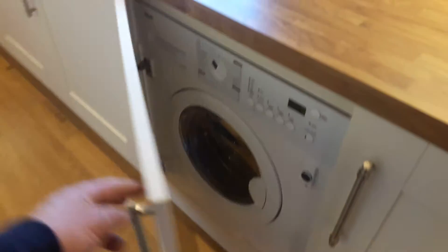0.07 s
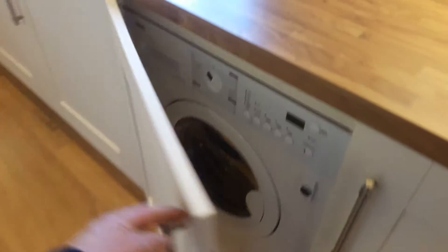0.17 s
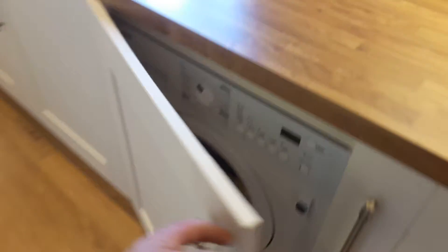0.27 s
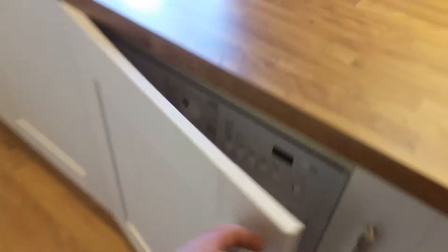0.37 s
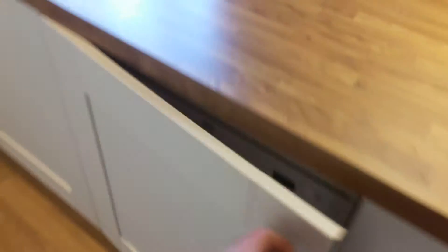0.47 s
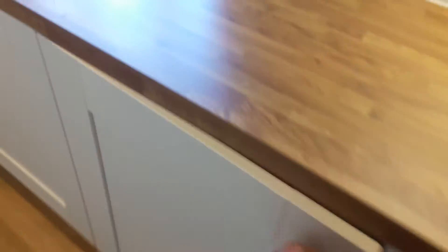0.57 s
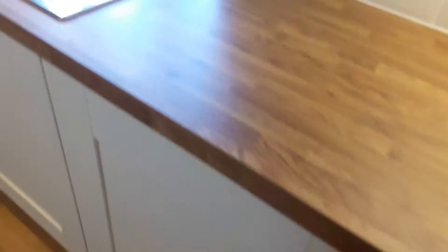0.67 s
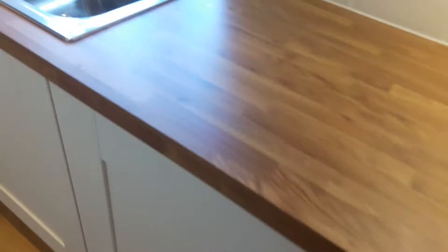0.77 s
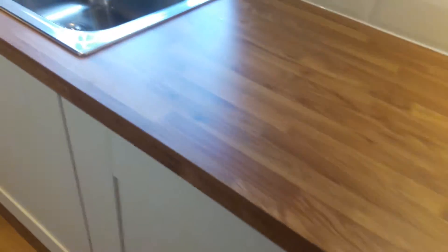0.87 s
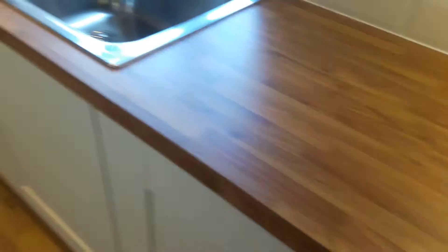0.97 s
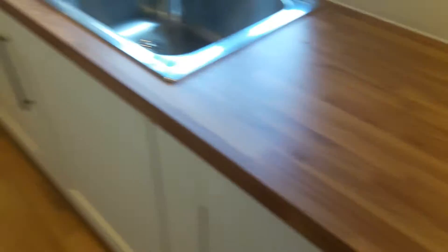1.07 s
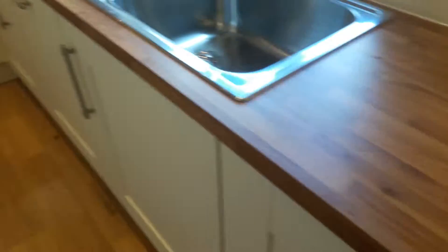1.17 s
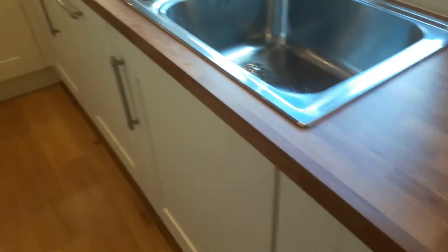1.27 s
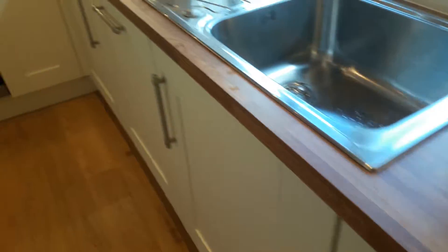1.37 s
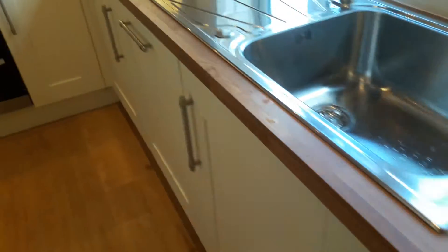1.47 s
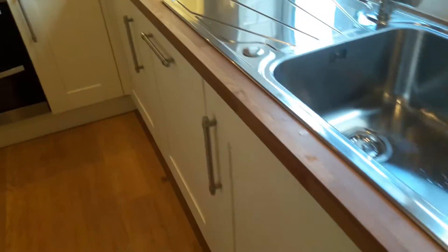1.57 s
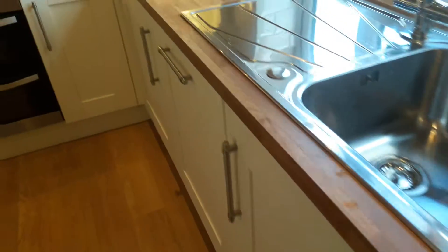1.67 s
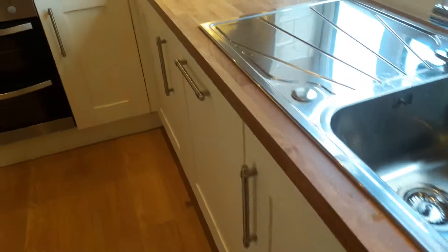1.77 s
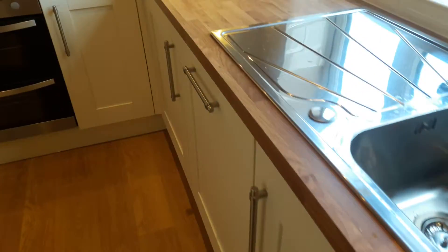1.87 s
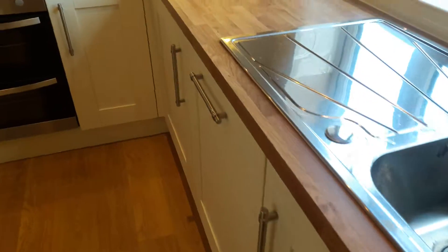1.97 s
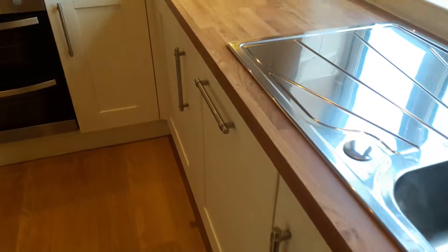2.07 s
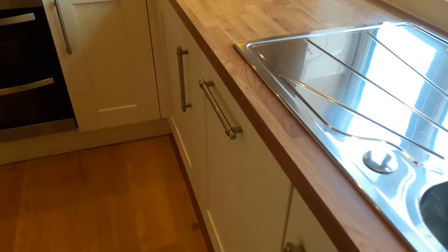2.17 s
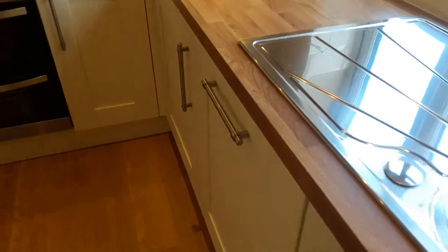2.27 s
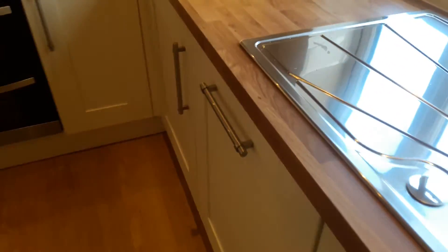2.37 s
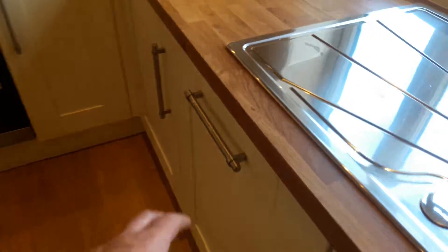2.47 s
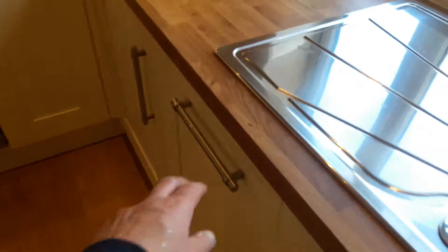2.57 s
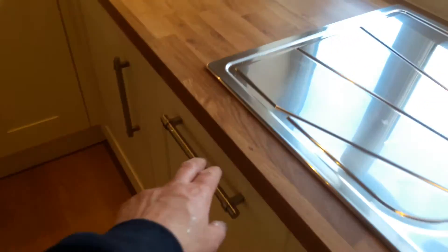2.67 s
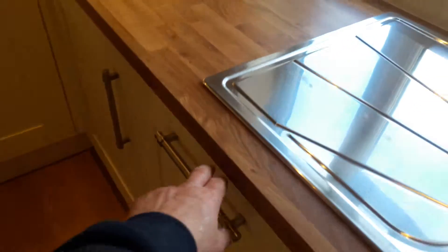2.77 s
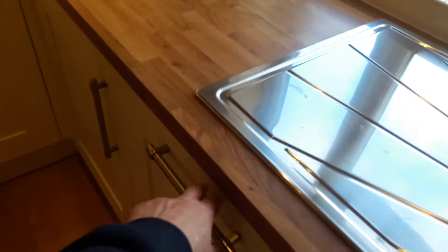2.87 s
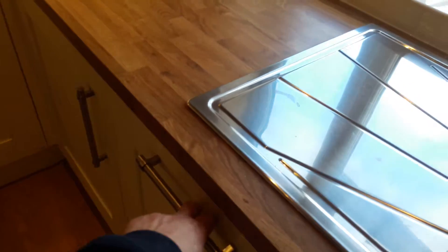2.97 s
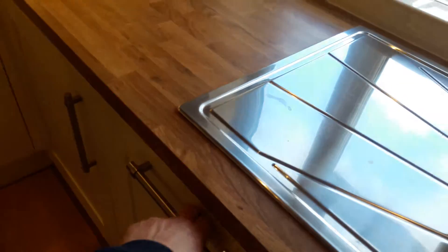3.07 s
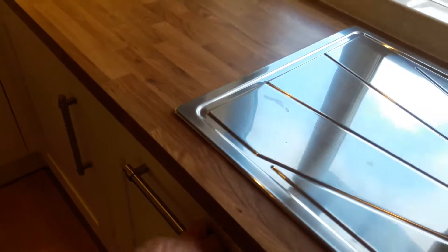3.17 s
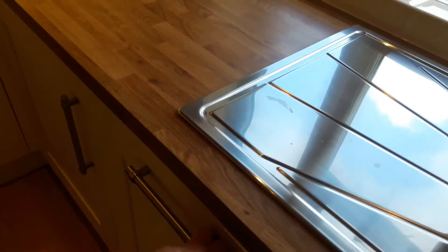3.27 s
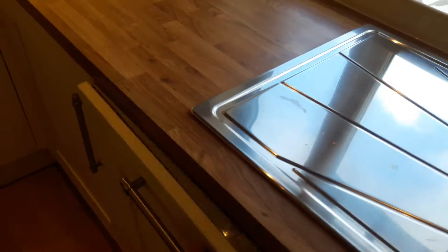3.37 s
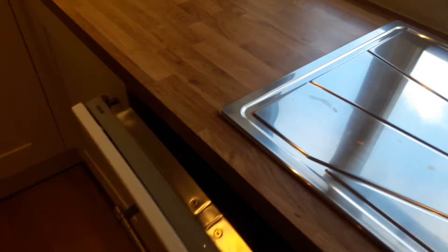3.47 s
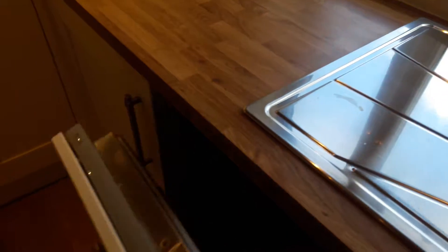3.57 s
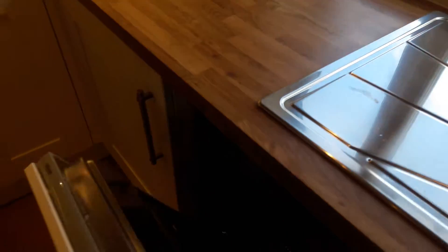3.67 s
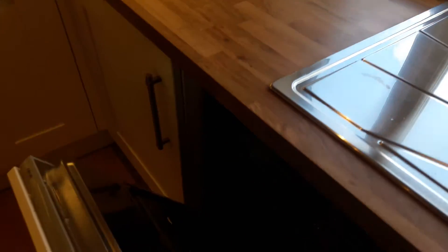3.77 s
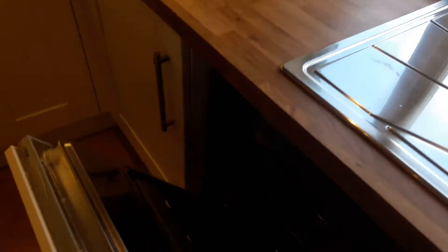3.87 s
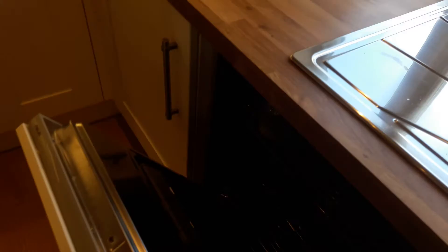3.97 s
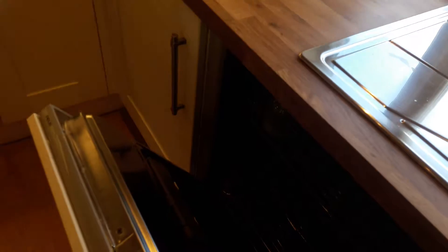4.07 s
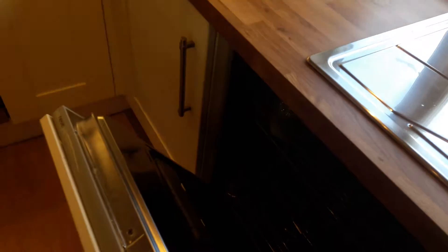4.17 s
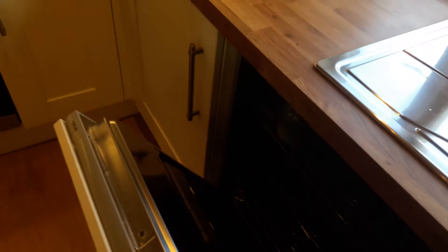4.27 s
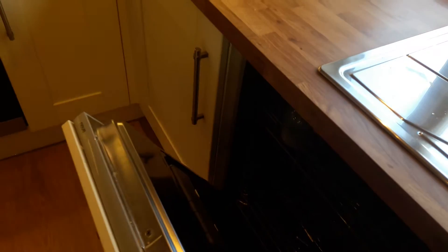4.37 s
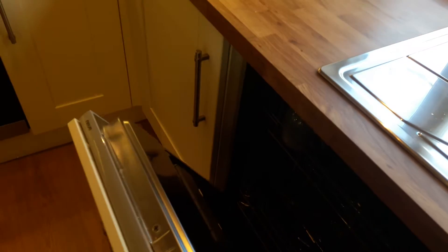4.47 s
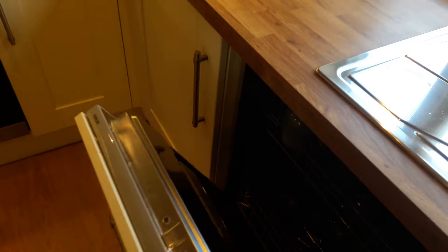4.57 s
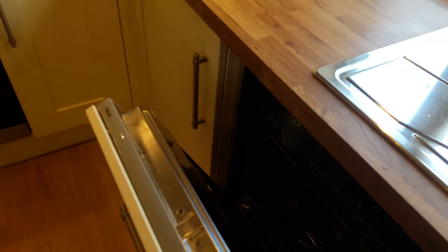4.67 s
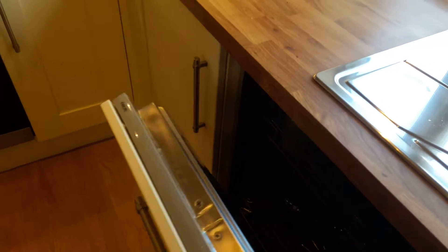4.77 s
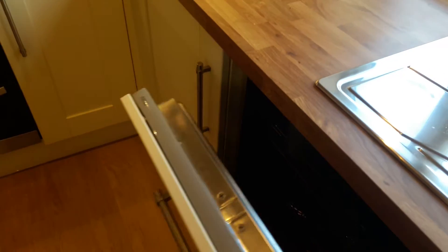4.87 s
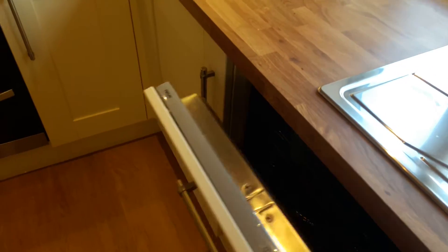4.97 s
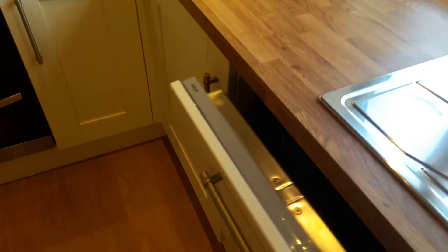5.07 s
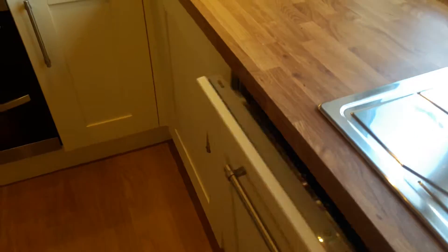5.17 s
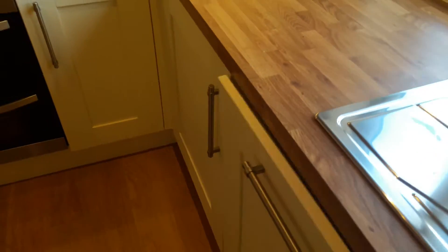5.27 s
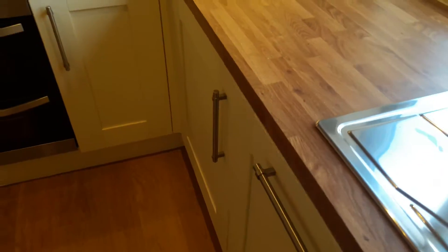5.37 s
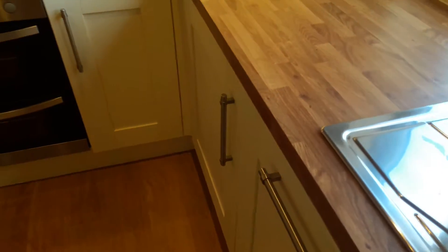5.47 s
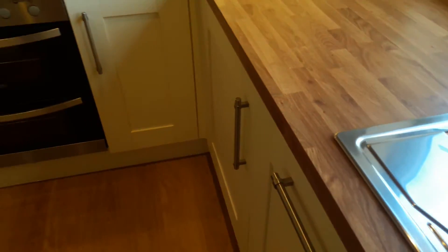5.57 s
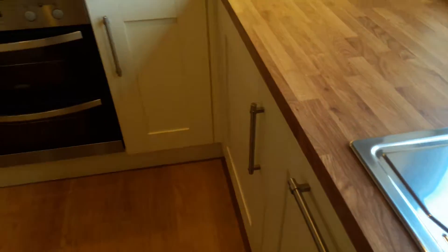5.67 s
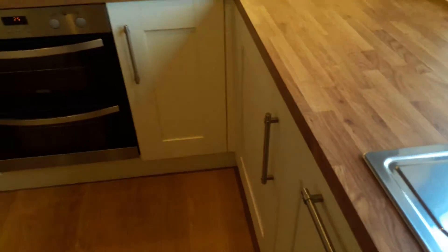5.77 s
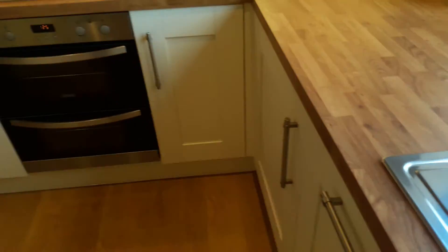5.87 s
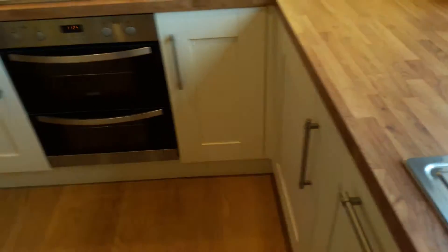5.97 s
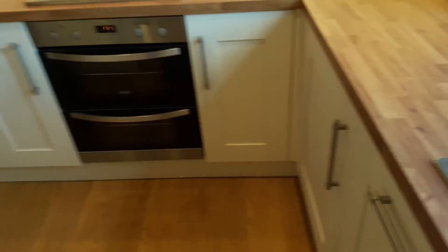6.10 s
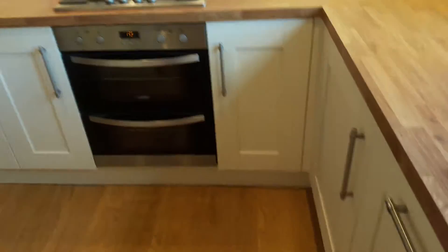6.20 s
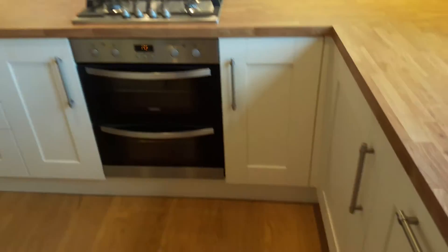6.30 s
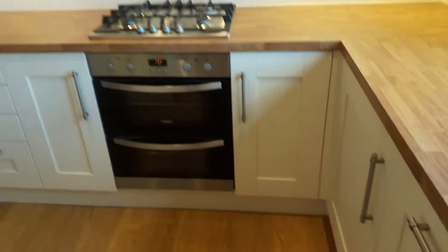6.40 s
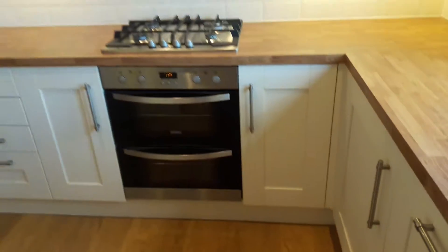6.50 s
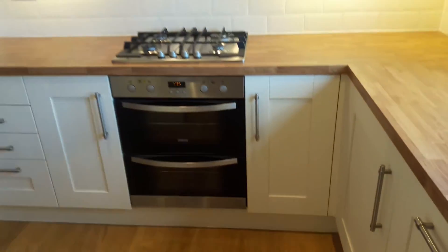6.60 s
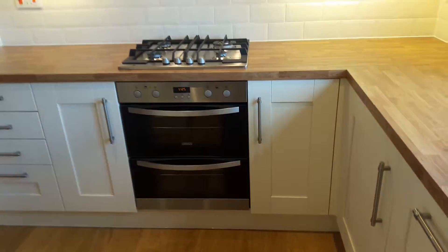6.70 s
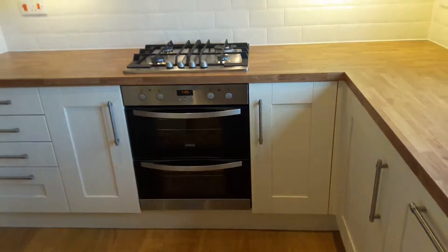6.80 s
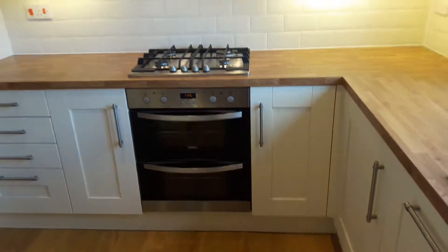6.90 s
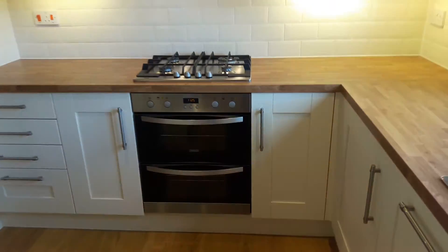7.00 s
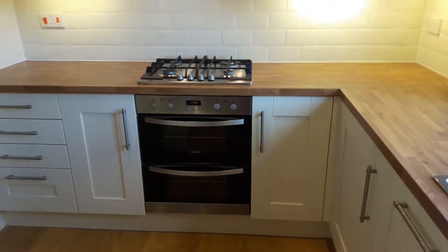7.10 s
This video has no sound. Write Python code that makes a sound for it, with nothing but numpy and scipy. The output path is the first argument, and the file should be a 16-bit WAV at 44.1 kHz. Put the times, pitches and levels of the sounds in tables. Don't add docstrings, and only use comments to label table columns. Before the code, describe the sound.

A quiet, bare kitchen with faint air hiss, heard through hand-held stereo microphones. Soft heel taps and a slight whoosh come at 0.2-0.45 seconds, then a wooden cupboard door shuts at about 0.78 with a tight cluster of hollow, woody knocks, ringing through the hard room. Shoes shuffle and heels tap at 1.5-1.6, with a firmer tap at 2.35 and a lighter one at 2.5; sleeves rustle. Tiny latch pings and a short push of air precede 3.39, when an appliance catch releases in a loud, sharp, rattling clunk. Cloth and soles brush over a fuzzy low hum until a step at 5.05. A faint, high hinge squeak at 5.36 and a low whoosh lead to a soft, dull seal bump at 5.47, then a heavy, full thud with a latch click at 5.74. Its tail fades under faint rustles and a light heel tap near 6.8, ending around 7.

```python
import sys
import numpy as np
from scipy import signal
from scipy.fft import rfft, irfft, next_fast_len
from scipy.io import wavfile
from scipy.ndimage import uniform_filter1d

SR = 44100
rng = np.random.default_rng(int(sys.argv[2]) if len(sys.argv) > 2 else 0)


def gain_from_db(level_db):
    decades = np.asarray(level_db, float) / 20
    return 10 ** decades


def generate_wav(signal):
    frames = np.transpose(np.atleast_2d(signal))
    scaled = np.clip(frames, -1, 1) * 32767
    pcm = np.round(scaled).astype(np.int16)
    wavfile.write(sys.argv[1], SR, pcm)


N = 314850

# time in seconds, strength in dB, contact time in ms.
CUPBOARD_BLOWS = [
    (.7735, -15, .12),
    (.7768, -5, .5),
    (.7797, -3, .3),
    (.7838, 0, .3),
    (.7868, -1, .3),
    (.790, 0, .25),
    (.8055, -4, .3),
]
LATCH_BLOWS = [
    (3.3902, -5, .15),
    (3.3945, -3, .3),
    (3.3985, 0, .4),
    (3.4043, -1, .2),
    (3.4085, -3, .1),
    (3.4205, -2, .3),
    (3.432, -4, .6),
]
SEAL_BLOWS = [
    (5.4678, -6, .15),
    (5.472, -4, .3),
    (5.4762, 0, 1.1),
]
SLAM_BLOWS = [
    (5.7338, -17, .1),
    (5.7376, 0, 1.1),
    (5.7422, -2, .5),
    (5.7465, -5, .25),
    (5.7495, -3, .6),
    (5.755, -3, 1.1),
]
# frequency in Hz, level in dB per Hz.
CUPBOARD_TONE = [(29, -69), (50, -41), (145, -10), (225, -6), (273, 2), (444, -7.5), (855, -21),
                 (1690, -17.5), (2550, -15.5), (3330, -32), (5020, -22), (12000, -39.5), (16500, -75)]
LATCH_TONE = [(29, -58), (50, -32), (135, -28), (190, 1.5), (273, -7), (501, -1), (739, -1), (919, 1.5),
              (1260, -8), (2050, -6.5), (7590, -27.5), (15000, -52), (16500, -71)]
SEAL_TONE = [(29, -39), (50, 3), (109, -11.5), (159, -5), (221, -1), (293, -2), (504, -14.5), (567, -12.5),
             (1050, -14.5), (1290, -19), (1840, -17), (14000, -57.5)]
SLAM_TONE = [(29, -48), (50, -23), (190, -1.5), (324, 0), (478, -17), (526, -5.5), (876, -4), (1120, -15),
             (2550, -18), (5400, -33), (8160, -39), (13300, -59), (16500, -65)]
# frequency in Hz, width in Hz, level in dB.
CUPBOARD_MODES = [(256, 52, 0), (557, 45, -2.5), (883, 73, -2.5), (1175, 49, -3.5), (1500, 61, -7.5),
                  (1920, 90, -14), (2270, 280, -15.5), (5000, 410, -15.5)]
LATCH_MODES = [(195, 24, -5), (490, 75, 2), (870, 74, -2), (1520, 64, -2), (2010, 98, -11),
               (2500, 250, -12), (3450, 200, -17.5), (7700, 1100, -21.5), (11800, 690, -30)]
SEAL_MODES = [(221, 120, -25), (607, 71, -18), (1010, 87, -6), (1820, 37, -25), (2040, 23, -20)]
SLAM_MODES = [(195, 34, 2.5), (484, 68, 2.5), (683, 47, -2.5), (1260, 69, -14), (1480, 57, -7),
              (2470, 280, -11.5), (4000, 750, -23), (8200, 400, -26)]
# level in dB, modes in dB, rattle in dB, rattle t60 in seconds (held to .02 to .16), room
# in dB.
CUPBOARD_BALANCE = (-26, -0.5, -5, -4, 2.5)
LATCH_BALANCE = (-22, 1, 0.5, -2.1, 3.5)
SEAL_BALANCE = (-40.5, -10.5, -4, -0.1, 4.5)
SLAM_BALANCE = (-19.5, 1, -7, .15, 3)
# time in seconds, pitch in Hz, peak in dB, t60 in seconds.
THUMPS = [(.775, 272, -17, 0.28), (.781, 1520, -16.5, .06), (.785, 880, -21, .06), (3.391, 195, -25, 0.29),
          (3.3925, 495, -11.5, 0.093), (3.392, 1140, -14, 0.074), (3.401, 1500, -16, 0.066),
          (3.39, 2050, -16, 0.059), (5.7355, 197, -9, 0.14), (5.7365, 477, -10.5, 0.2),
          (5.74, 1480, -10.5, 0.062)]
# time in seconds, peak in dB, heel pitch in Hz, floor boom in dB.
STEPS = [(0.2196, -39.5, 497, 3.5), (.298, -44.5, 800, 6), (.438, -44, 596, -4), (1.5404, -36.5, 480, -6.5),
         (1.6299, -32.5, 520, -2), (2.3462, -26.5, 564, -2.5), (2.376, -47, 506, -5),
         (2.5227, -34, 590, -7.5), (5.0478, -32.5, 590, -1.5), (6.482, -48, 311, 8),
         (6.8081, -35.5, 690, -2), (6.84, -47.5, 300, 5)]
# frequency in Hz, width in Hz, level in dB.
FLOOR_BOOM = [(187, 78, 5.5), (329, 123, 13)]
# time in seconds, peak in dB, pitch in Hz, t60 in seconds.
TICKS = [
    (1.585, -48, 8800, .004),
    (1.886, -51, 11100, 0.0087),
    (6.49, -67, 11000, .006),
    (3.235, -55, 3730, .05),
    (3.26, -54, 3510, .05),
    (5.078, -46, 2700, .03),
]
# start in seconds, stop in seconds, level in dB.
SWING = [
    (.2, 0.442, -55.5),
    (3.282, 3.389, -53),
    (5.31, 5.453, -51),
]
# start in seconds, length in seconds, level in dB.
HANDLING = [(0, 0.2, -65.5), (.42, 0.18, -61.5), (1.28, 0.18, -61.5), (1.52, .25, -58), (2.32, 0.13, -68),
            (3.03, .22, -62.5), (3.82, .3, -65), (5.3, 0.1, -60), (6.44, 0.31, -66)]
# start in seconds, length in seconds, level in dB.
SHUFFLES = [(.21, 0.29, -56), (.42, 0.49, -58), (1.15, 0.23, -54), (1.53, 0.43, -50), (1.96, 0.62, -58),
            (2.33, 0.21, -54.5), (2.54, 0.34, -55.5), (2.84, 0.55, -56.5), (3.1, 1, -54.5),
            (3.75, 0.3, -51.5), (4.4, 0.46, -58), (5.045, 0.18, -50), (5.34, 0.21, -55.5), (6.2, 0.17, -68),
            (6.48, 0.83, -55), (6.79, 0.21, -51.5)]
# start in seconds, length in seconds, level in dB, fine fizz in dB.
RUSTLES = [(.24, 0.15, -59, -88), (1.2, 0.35, -63.5, -71), (1.54, 0.17, -56, -85), (1.86, 0.14, -80, -68),
           (1.97, 0.6, -58.5, -74), (2.55, 0.21, -57, -70), (2.79, 0.28, -55.5, -78),
           (3.17, 0.22, -60, -66), (3.78, 0.32, -54.5, -60), (4.15, 0.44, -61, -72),
           (4.42, 0.32, -57.5, -80), (5.05, 0.1, -55, -69), (5.31, 0.067, -63, -90), (6.33, 0.13, -67, -75),
           (6.48, 0.12, -61, -64), (6.7, 0.43, -58, -72)]
# low edge in Hz, high edge in Hz.
MOVE_BANDS = [(30, 220), (500, 2230), (2800, 7240), (10000, 22000)]
# start in seconds, length in seconds, level in dB.
HUM_SWELLS = [(.05, 0.33, -73), (1.86, 0.56, -71.5), (3.0, 0.33, -61.5), (3.28, 0.23, -63),
              (3.85, 0.12, -64), (4.2, 0.28, -67.5), (4.42, 0.44, -67.5), (4.76, .35, -68.5),
              (5.27, 0.42, -65.5), (6.32, 0.14, -71), (6.5, 0.31, -62.5), (6.8, 0.13, -52.5)]
# frequency in Hz, level in dB per Hz.
AIR_COLOUR = [(15, -21), (25, -17.5), (36, -23), (53, -18), (145, -7), (217, -0.5), (344, -5), (818, -8.5),
              (1370, -8.5), (2050, -7.5), (5880, -23), (7710, -20.5), (9570, -29), (14800, -23),
              (16000, -42)]
# frequency in Hz, t60 in seconds.
ROOM_DECAY = [(60, 0.82), (160, 0.86), (420, 0.51), (1100, 0.98), (2900, 0.82), (6000, 0.65), (9500, 0.44),
              (15000, 0.25)]
# frequency in Hz, t60 in seconds, level in dB.
ROOM_MODES = [(161, 0.75, -28.5), (201.4, 0.47, -23.5), (281.4, 0.514, -24.5), (502, 0.3, -30.5)]
# frequency in Hz, correlation from -1 to 1.
LIKENESS = [(40, 0.52), (150, 0.96), (380, 0.84), (800, 0.58), (1400, -0.35), (3000, 0.076), (15000, -0.22)]
# frequency in Hz, left over right in dB.
PORT_LEAN = [(60, 0), (400, 1.5), (1400, -1.7), (3500, -5.5), (6000, -5.5), (8500, 3), (11000, 8),
             (15000, 3)]

BLUR_S, BLUR = .3, 4
THUMP_RISE_S = 0.0041
GRIT_DB, STEP_ROOM_DB = -19, 1
STEP_DAMPING, STEP_TOP_HZ = .5, 3500
SQUEAK_S, SQUEAK_LENGTH_S, SQUEAK_DB = 5.36, .085, -68
SQUEAK_HZ, SQUEAK_SAG_HZ_PER_S = 6460, 3200
RISE, FALL = 0.13, 0.51
HUM_HZ, HUM_WIDTH_HZ = 207, 24
AIR_DB = -60
EDGE_HZ = 16700


def door(blows, tone, modes, balance):
    level_db, modes_db, rattle_db, rattle_t60, wet_db = balance
    first = blows[0][0]
    t = np.arange(SR // 4) / SR
    force = np.zeros(len(t))
    for s, db, ms in blows:
        push = np.exp(-.5 * ((t - (s - first) - ms / 500) / (ms / 4000)) ** 2)
        force -= gain_from_db(db) * push / push.sum()
    hits = rng.standard_normal(len(t)) * (rng.random(len(t)) < .3)
    rattle = hits * gain_from_db(-60 * t / np.clip(rattle_t60, .02, .16)) * np.minimum(t / .004, 1)
    force += gain_from_db(rattle_db) * rattle / np.linalg.norm(rattle)

    z = np.fft.fft(room(force, wet_db, spread(0.92)), 2 * SR)
    hz = abs(np.fft.fftfreq(2 * SR, 1 / SR))
    uneven = uniform_filter1d(abs(z.mean(0)) ** 2, size=120, mode="wrap")
    z = z / causal(uneven / uneven.mean())

    def through_panel(widen):
        panel = causal(radiated(hz, tone, modes, modes_db, widen))
        return np.fft.ifft(z * panel).real[:, :SR]

    early, late = through_panel(1), through_panel(BLUR)
    heard = early + (late - early) * np.minimum(np.arange(SR) / SR / BLUR_S, 1)
    heard *= gain_from_db(level_db) / np.sqrt(np.mean(heard.mean(0)[:10000] ** 2))
    return first, heard


def radiated(hz, tone, modes, modes_db, widen):
    panel = gain_from_db(2 * read(tone, hz))
    for f, width, db in modes:
        wide = widen * max(width, f / 22)
        panel += gain_from_db(2 * (db + modes_db)) / widen / (1 + (2 * (hz - f) / wide) ** 2)
    return panel / (1 + (100 / (hz + 1)) ** 4)


def spread(ms):
    t = np.arange(400) / SR
    parts = rng.standard_normal((2, len(t))) * np.exp(-1000 * t / ms)
    parts = pair(np.pad(parts, ((0, 0), (0, 3696))))[:, :len(t)]
    parts[:, 0] += 2.5
    return parts / np.linalg.norm(parts, axis=1, keepdims=True)


def thump(s, hz, db, t60):
    t = np.arange(SR // 3) / SR
    rise = np.minimum(t / THUMP_RISE_S, 1)
    return s, -gain_from_db(db - 60 * t / t60) * rise * np.sin(2 * np.pi * hz * t)


def step(s, db, hz, boom_db):
    t = np.arange(SR // 8) / SR
    heel = -np.sin(2 * np.pi * hz * t) * np.sin(np.pi * np.minimum(t * hz / 2.7, 1)) ** .5
    heel -= .4 * np.sin(2 * np.pi * 1.8 * hz * t) * gain_from_db(-60 * t / .014)
    boom = np.zeros(len(t))
    for f, width, g in FLOOR_BOOM:
        boom -= gain_from_db(g) * np.cos(2 * np.pi * f * t) * np.exp(-np.pi * width * t)
    boom *= np.minimum(t / 0.0054, 1)
    grit = 3 * ring(rng.standard_normal(len(t)), 1300, 1600) * gain_from_db(-60 * t / .05)
    tap = gain_from_db(db) * (heel + gain_from_db(boom_db) * boom + gain_from_db(GRIT_DB) * grit)
    stiff = signal.butter(2, (120, STEP_TOP_HZ), "bandpass", fs=SR, output="sos")
    return s, room(signal.sosfilt(stiff, tap), STEP_ROOM_DB, damping=STEP_DAMPING)


def tick(s, db, hz, t60):
    t = np.arange(SR // 20) / SR
    return s, room(gain_from_db(db - 60 * t / t60) * np.sin(2 * np.pi * hz * t), -2.5)


def squeak():
    t = np.arange(0, SQUEAK_LENGTH_S, 1 / SR)
    waver = evened(uniform_filter1d(rng.standard_normal(len(t)), 150))
    pitch = SQUEAK_HZ - SQUEAK_SAG_HZ_PER_S * t + 30 * waver
    tone = np.sin(2 * np.pi * np.cumsum(pitch) / SR)
    return SQUEAK_S, room(gain_from_db(SQUEAK_DB) * tone * np.hanning(len(t)) ** 0.91, -1.5)


def swing():
    t = np.arange(N) / SR
    push = np.zeros(N)
    for start, stop, db in SWING:
        push += gain_from_db(db) * np.clip((t - start) / (.4 * (stop - start)), 0, 1) * (t < stop)
    return evened(ring(noise(), 280, 130)) * uniform_filter1d(push, size=400)


def moves():
    out = np.zeros((2, N))
    gains = gestures(HANDLING), gestures(SHUFFLES), gestures(RUSTLES), gestures(RUSTLES, column=3)
    for band, gain, trim_db in zip(MOVE_BANDS, gains, (-1.0, -1.65, -7.5, -2.3)):
        grain = gain_from_db(1.7 * evened(uniform_filter1d(rng.standard_normal(N), 500)))
        edges = signal.butter(2, band, "bandpass", fs=SR, output="sos")
        out += evened(signal.sosfilt(edges, noise()) * grain) * gain * gain_from_db(trim_db)
    return out


def gestures(rows, column=2):
    t = np.arange(N) / SR
    power = np.zeros(N)
    for row in rows:
        swell = np.interp((t - row[0]) / row[1], [0, RISE, 1 - FALL, 1], [0, 1, 1, 0])
        power += (gain_from_db(row[column]) * swell) ** 2
    return np.sqrt(power)


def air():
    size = next_fast_len(N)
    colour = gain_from_db(read(AIR_COLOUR, np.fft.rfftfreq(size, 1 / SR)))
    hiss = irfft(rfft(noise(), size) * colour, size)[:, :N]
    hum = ring(ring(noise(), HUM_HZ, HUM_WIDTH_HZ), HUM_HZ, 68)
    return gain_from_db(AIR_DB + 1.5) * evened(hiss) + evened(hum) * gestures(HUM_SWELLS) * gain_from_db(4.5)


def noise():
    return pair(rng.standard_normal((2, next_fast_len(N))))[:, :N]


def room(x, wet_db, direct=0.94, damping=1):
    at = np.arange(60, SR - 20, 12)
    at = at + rng.integers(0, 12, (2, len(at)))
    taps = np.zeros((2, SR))
    np.put_along_axis(taps, at, rng.choice([-1., 1.], at.shape), 1)
    hz, t, z = signal.stft(taps, SR, nperseg=256)
    decay = gain_from_db(-60 * t / (damping * read(ROOM_DECAY, hz)[:, None]))
    tail = signal.istft(z * decay, SR, nperseg=256)[1][:, :SR]
    z = rfft(pair(tail))
    even = irfft(z / np.sqrt(uniform_filter1d(abs(z) ** 2, size=45)), SR)
    t = np.arange(SR) / SR
    tail = even * np.minimum(t / 0.00083, 1) * (t < .9)
    tail /= np.linalg.norm(tail[0])
    for mode_hz, t60, db in ROOM_MODES:
        standing = gain_from_db(-60 * t / t60) * np.sin(2 * np.pi * mode_hz * t)
        tail += gain_from_db(db) * standing / np.linalg.norm(standing)
    tail *= gain_from_db(wet_db)
    direct = np.atleast_2d(direct)
    tail[:, :direct.shape[1]] += direct
    return signal.fftconvolve(x[None], tail, axes=1)


def pair(a):
    z = rfft(a)
    same = np.clip(read(LIKENESS, np.fft.rfftfreq(a.shape[1], 1 / SR)), -1, 1)
    return irfft([z[0], same * z[0] + np.sqrt(1 - same ** 2) * z[1]], a.shape[1])


def ring(x, hz, width):
    r = np.exp(-np.pi * width / SR)
    return 2 * signal.lfilter([1 - r], [1, -r * np.exp(2j * np.pi * hz / SR)], x).real


def causal(power):
    return np.exp(np.conj(signal.hilbert(np.log(power + 1e-10) / 2)))


def evened(x):
    return x / np.sqrt(np.mean(x ** 2) + 1e-20)


def read(points, hz):
    f, value = np.transpose(points)
    return np.interp(np.log(hz + 1), np.log(f + 1), value)


def add(mix, s, sound):
    part = mix[..., round(s * SR):][..., :sound.shape[-1]]
    part += sound[..., :part.shape[-1]]


def scene():
    mix = air() + moves() + swing()
    add(mix, *door(CUPBOARD_BLOWS, CUPBOARD_TONE, CUPBOARD_MODES, CUPBOARD_BALANCE))
    add(mix, *door(LATCH_BLOWS, LATCH_TONE, LATCH_MODES, LATCH_BALANCE))
    add(mix, *door(SEAL_BLOWS, SEAL_TONE, SEAL_MODES, SEAL_BALANCE))
    add(mix, *door(SLAM_BLOWS, SLAM_TONE, SLAM_MODES, SLAM_BALANCE))
    for make, rows in (step, STEPS), (thump, THUMPS), (tick, TICKS):
        for row in rows:
            add(mix, *make(*row))
    add(mix, *squeak())
    return mix


def low_pass(x):
    return signal.sosfilt(signal.butter(12, 16800, fs=SR, output="sos"), x)


def record(dry):
    size = next_fast_len(N)
    hz = np.fft.rfftfreq(size, 1 / SR)
    lean = read(PORT_LEAN, hz) / 2
    ports = rfft(1.5 * np.tanh(dry / 1.5), size) * gain_from_db(np.array([lean, -lean]))
    limit = np.clip((EDGE_HZ - hz) / 300, 0, 1)
    mix = irfft(ports * limit, size)[:, :N] - .0005
    return low_pass(mix)


dry = scene()
out = record(dry)
generate_wav(out)
```